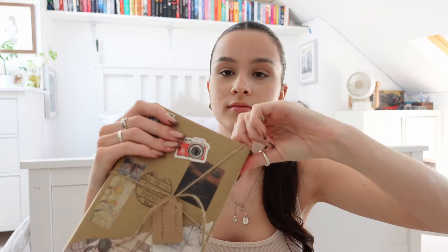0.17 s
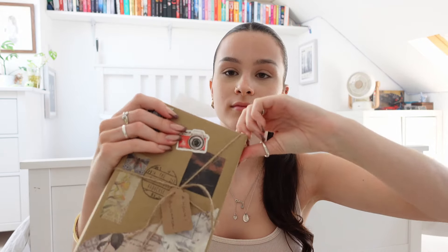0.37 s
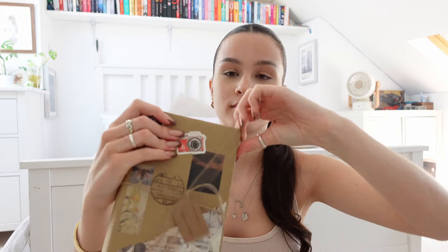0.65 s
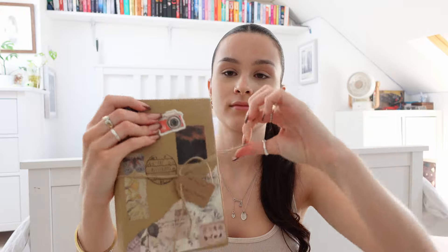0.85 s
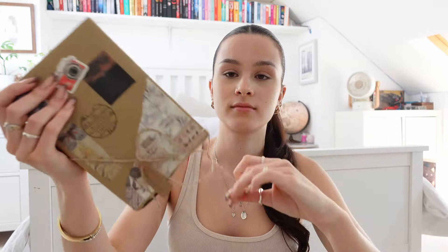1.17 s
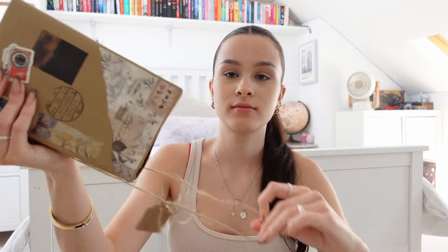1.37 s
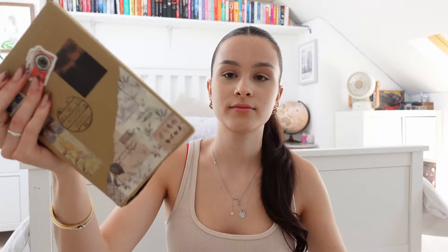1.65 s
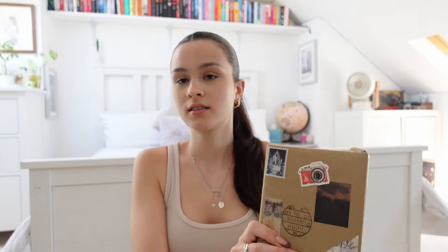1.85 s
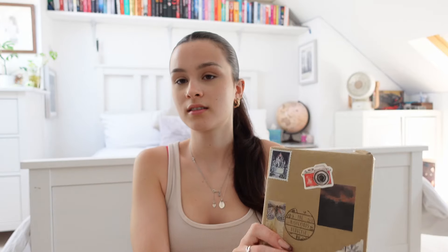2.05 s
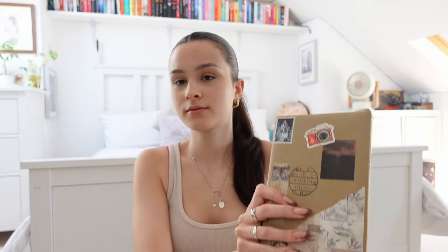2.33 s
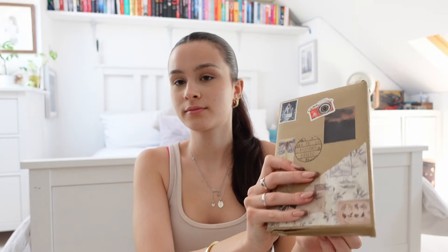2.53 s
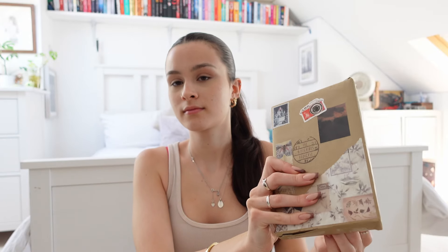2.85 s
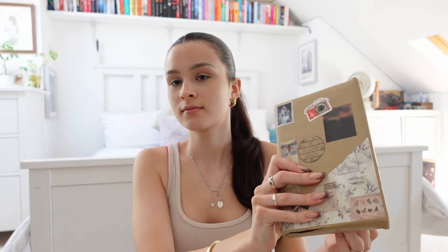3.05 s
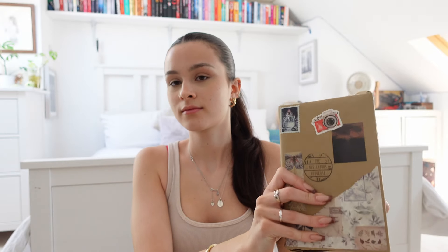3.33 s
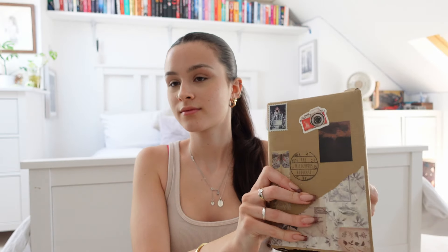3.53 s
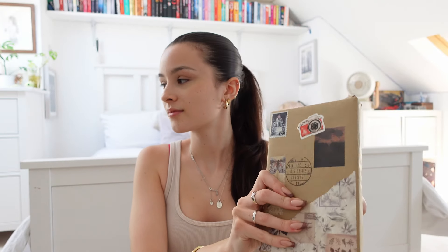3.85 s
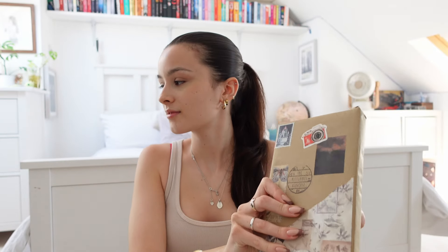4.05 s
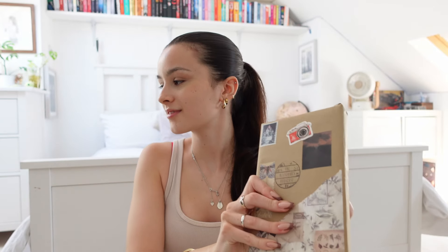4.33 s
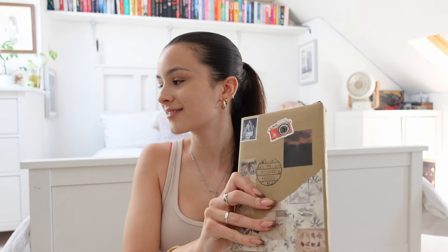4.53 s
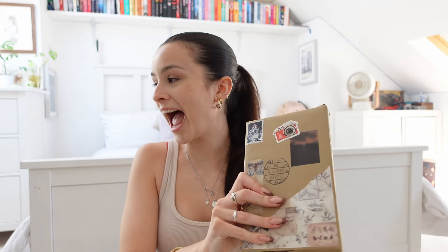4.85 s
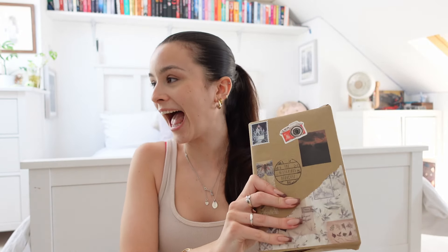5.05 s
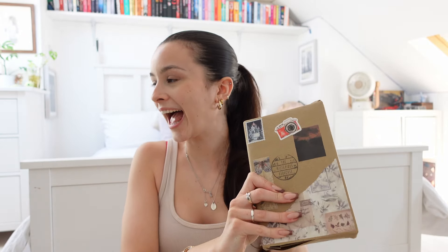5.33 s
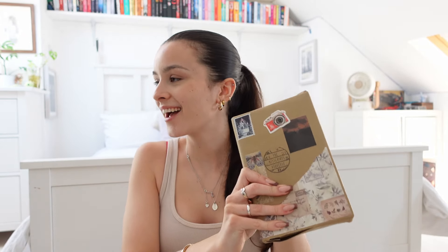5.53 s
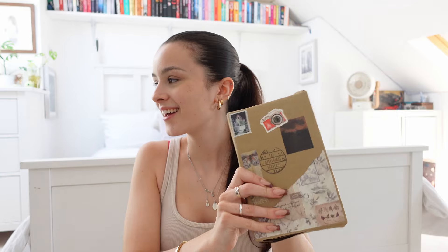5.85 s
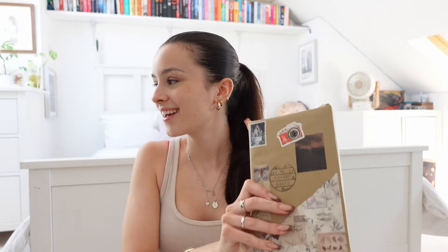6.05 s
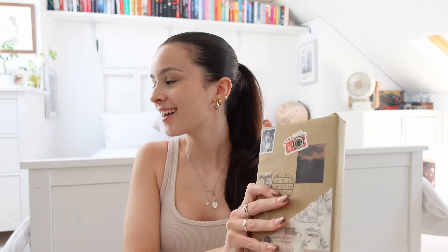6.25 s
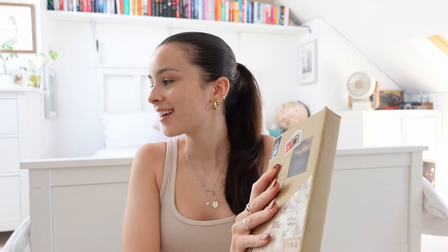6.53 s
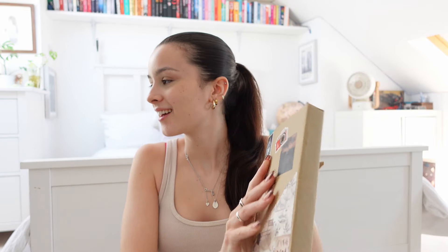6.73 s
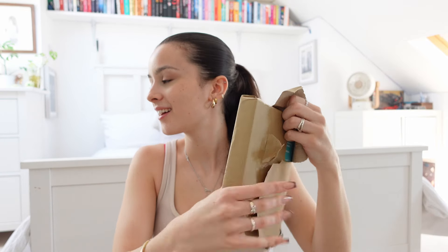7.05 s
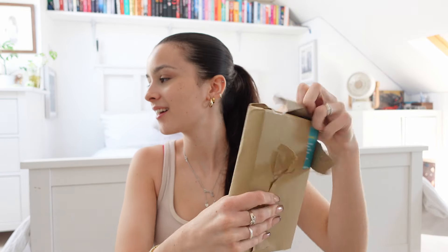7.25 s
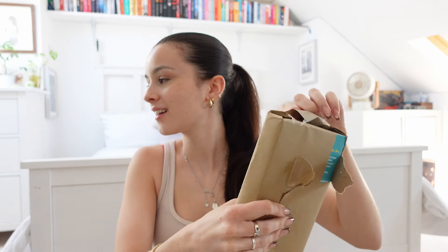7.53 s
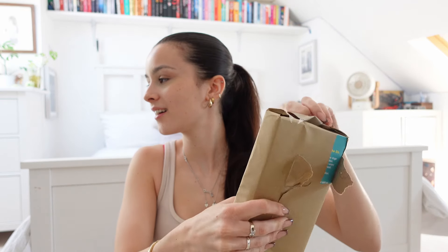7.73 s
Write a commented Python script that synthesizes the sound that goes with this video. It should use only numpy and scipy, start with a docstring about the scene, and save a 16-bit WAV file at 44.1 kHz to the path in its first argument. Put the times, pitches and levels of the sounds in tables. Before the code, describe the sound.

In a small, quiet room with faint steady hush, a book wrapped in stiff brown paper is handled close to the microphone. From 0 to 0.6 s there are faint rustles and tiny clicks; at about 0.7 s a sharp double crease snaps with dull finger knocks. From 1.0 to 1.55 s string rasps in short dry jerks, with a faint airy, fuzzy note, ending in a brief bright swish. Crinkles burst at 1.9 s, soft taps follow, and another crackle comes at 2.9 s. Fuller rustling and snaps fill 3.2 to 3.7 s. After a softer stretch, a crisp snap lands at 4.6 s. The densest crumpling and a firm knock come around 5.6 to 5.75 s, with more creases from 5.9 to 6.5 s. After a lull, knocks and bright tearing begin near 7.1 s, the loudest snap hits at 7.3 s, and gritty crackles thin out by 7.9 s.

```python
"""Creases of brown paper snap sharply, each with a short crumple, as a wrapped book is turned and torn open.
Each snap is a millisecond noise burst ringing a facet; rustle is noise and crackles coloured by the sheet.
Hands knock dully on the book: a damped resonance with a puff of noise. The string sings faintly as narrow
noise and scratches in short jerks. All is close to the microphone in a small room with a steady hush."""
import sys
import numpy as np
from scipy import signal
from scipy.fft import rfft, irfft
from scipy.io import wavfile
from scipy.ndimage import uniform_filter1d

SR = 44100
rng = np.random.default_rng(int(sys.argv[2]) if len(sys.argv) > 2 else 0)


def transcribe(u):
    """Save the signal u as a 16-bit wav file named by the first command-line argument.

    u: samples, shape (n,) or (channels, n), limited to [-1, 1]; the rate is SR.
    q: integer samples, one column per channel.
    """
    v = np.clip(np.atleast_2d(u).T, -1, 1)
    q = np.round(v * 32767).astype(np.int16)
    wavfile.write(sys.argv[1], SR, q)


N = 347508
TIME = np.arange(N) / SR
TAPS = 2048  # length of the short filters, samples
BINS = np.fft.rfftfreq(TAPS, 1 / SR)
MILLISECOND = SR / 1000  # in samples

# steady sound of the quiet room, relative spectrum: frequency_hz [Hz], density_db [dB per Hz]
HUSH_SPECTRUM = [(18, -80), (30, -42), (280, -13), (499, -16), (616, -4), (721, -5), (937, -9.5),
                 (1500, -20.5), (1810, -9), (2010, -22), (2980, -18.5), (7090, -17), (11400, -23),
                 (12600, -23), (16000, -27)]
HUSH_DB = -63
# decay of the room: frequency_hz [Hz], t60_s [s]
ROOM_DECAY = [(250, 0.58), (500, 0.19), (1000, 0.34), (2000, 0.27), (4000, 0.3), (7500, 0.2), (13000, 0.17)]
# reflections from near surfaces, before their times are scattered: delay_s [s], gain [amplitude ratio]
NEAR_ECHOES = [(.0071, 0.14), (0.0182, 0.14), (0.0204, .18), (.0272, 0.069)]
# weighting of the room's side signal: frequency_hz [Hz], side_db [dB]
SIDE_WIDTH = [(100, -4), (220, -8), (380, -10), (700, -6.5), (1200, -8), (2500, -8), (5000, -6.5),
              (14000, -3)]
# where the parcel is held: time_s [s], left_minus_right_db [dB]
PLACE_CURVE = [(0, 0.7), (1.2, 1.2), (1.6, 3), (2.2, -1.5), (3.0, .3), (5.7, 0.5), (7.2, -0.3),
               (7.88, -0.5)]
EDGE_HZ = 16100  # the recorder's upper band limit

# string running over the paper's edge: time_s [s], level_db [dB]
STRING_CURVE = [(1.1, -76), (1.24, -73), (1.285, -52), (1.32, -66), (1.4, -64), (1.45, -55.5), (1.485, -61),
                (1.525, -43.5), (1.56, -83)]
# jerks of the string rasping across the paper: start_s [s], length_s [s], level_db [dB]
STRING_TUGS = [(1.015, 0.039, -48.5), (1.055, 0.02, -46.5), (1.072, 0.023, -41), (1.103, 0.019, -44.5),
               (1.14, 0.05, -42), (1.198, 0.016, -50), (1.217, 0.032, -46), (1.268, 0.032, -44.5),
               (1.354, 0.017, -54.5), (1.424, 0.012, -59)]
# rasp of the string's fibres, relative spectrum: frequency_hz [Hz], density_db [dB per Hz]
RASP_SPECTRUM = [(300, -43), (1500, -15.5), (2500, -6.5), (4000, -7), (7000, 1.5), (11000, -2),
                 (15500, -8.5)]

# fingers knocking on the wrapped book: start_s [s], level_db [dB over 1 ms, before the low cut], pitch_hz [Hz]
KNOCK_EVENTS = [(0.435, -49, 350), (0.594, -46.5, 682), (0.705, -31, 310), (0.724, -34, 635),
                (1.764, -51, 373), (1.818, -41.5, 910), (2.113, -35, 700), (2.129, -34, 1140),
                (2.532, -41, 1480), (2.83, -45, 666), (2.941, -27.5, 960), (3.755, -41.5, 970),
                (4.108, -36.5, 1250), (5.319, -28.5, 982), (5.365, -31.5, 370), (5.61, -33.5, 372),
                (5.688, -18, 1160), (5.822, -31, 364), (6.372, -36.5, 730), (7.16, -27.5, 304),
                (7.203, -23, 336), (7.412, -34, 352), (7.761, -40.5, 362)]
# dull puff of paper pressed on the book, relative spectrum: frequency_hz [Hz], density_db [dB per Hz]
PUFF_SPECTRUM = [(40, -8), (140, -16), (300, 1.5), (1200, -3.5), (2200, -6), (6000, -27)]

# radiation of the paper, with the hollow of the parcel near 325 Hz, relative spectrum:
# frequency_hz [Hz], density_db [dB per Hz]
PAPER_SPECTRUM = [(30, -31), (60, -65), (150, -27), (250, -19.5), (325, -2.5), (480, -5.5), (800, -7.5),
                  (1150, -3.5), (3000, -0.5), (6000, -0.5), (10000, -4), (15500, -10)]
# share of the rustle that comes as separate crackles, low while rubbing, high once the paper tears:
# time_s [s], share [0-1]
GRIT_CURVE = [(0, 0.27), (1.5, 0.19), (2.8, 0.28), (4.0, 0.085), (5.0, 0.22), (6.5, 0.088), (7.3, 0.63),
              (7.55, 1)]
# strokes of paper sliding or tearing under the hands: start_s [s], length_s [s],
# level_db [dB of the drive, before colour and trim], brightness [dB per octave],
# body_db [dB, in the low hundreds of Hz], ring_hz [Hz, of the sheet]
SLIDE_STROKES = [(0.248, 0.2, -55.5, 2.5, 6, 8200), (0.486, 0.21, -55.5, 3.5, -2, 4200),
                 (0.672, 0.2, -47.5, 3, 10, 700), (1.057, 0.32, -58, 4, 6, 3880),
                 (1.414, 0.13, -60.5, 5.5, -3, 2300), (1.489, 0.061, -35.5, 5, -15, 6200),
                 (1.898, 0.064, -33, 4.5, 6, 600), (2.007, 0.088, -47, 2, 4, 5700),
                 (2.087, 0.085, -47.5, -1, 14.5, 4930), (2.17, 0.21, -65.5, -8.5, 13.5, 786),
                 (2.356, .11, -54, -2.5, 5, 4870), (2.581, 0.13, -50, 0, 6, 3500),
                 (2.707, 0.09, -49.5, 4.5, 5, 600), (2.878, 0.2, -53.5, -1, 13.5, 1000),
                 (3.102, 0.068, -50, -1.5, 11, 5500), (3.193, .07, -47.5, -4, 8, 7800),
                 (3.225, 0.18, -32.5, -0.5, 4, 595), (3.364, 0.18, -35.5, -3.5, -8, 4970),
                 (3.936, 0.11, -36, 1.3, 6.5, 6900), (4.102, 0.085, -44, 1.5, 13, 4900),
                 (4.239, 0.083, -51.5, 1.5, 15, 603), (4.418, 0.16, -45, 2.5, 10.5, 2970),
                 (4.586, 0.084, -31, 2, 4, 996), (4.878, 0.14, -48.5, 0, 7, 1000),
                 (5.027, 0.14, -39, 0.5, 4, 990), (5.258, 0.17, -39, 1.5, 7, 1100),
                 (5.462, 0.094, -47, 0.5, 6, 2200), (5.627, 0.075, -42.5, 3.5, 2, 7800),
                 (5.74, 0.12, -54, 5, 10, 1200), (5.931, 0.18, -35, -1.5, -2.5, 1800),
                 (6.171, 0.33, -49, 1.6, 7.5, 2330), (6.483, 0.094, -35, 1.5, 3, 2700),
                 (6.613, 0.16, -46.5, -2, -8, 1090), (6.763, 0.1, -47.5, 2, 0, 3500),
                 (7.102, 0.21, -46.5, 1.5, 18, 1200), (7.216, 0.23, -45, 3.5, 5, 600),
                 (7.346, 0.17, -40.5, 5, -15, 5500), (7.54, 0.14, -45, 4, -16, 3500),
                 (7.674, 0.16, -53.5, 6.5, 0, 2960)]
# faint shifting of the fingers between strokes: time_s [s], level_db [dB of the drive, before colour and trim]
GRIP_CURVE = [(0, -74), (1.7, -75), (2.2, -77), (3.0, -61), (3.6, -57.5), (3.85, -65.5), (5.0, -56),
              (6.6, -55), (6.95, -70), (7.5, -60.5), (7.88, -63)]
GRIP_BRIGHTNESS, GRIP_BODY_DB, GRIP_RING_HZ = 0.3, 9, 1710  # dB per octave, dB, Hz
# every stroke gathers speed, slows a little and stops
ATTACK_S, RELEASE_S, SAG_DB = 0.033, 0.036, 3
# a sliding sheet favours one broad band
SHEET_DB, SHEET_OCTAVES = 4, 0.51
# gentle rubbing, below this stroke level, loses treble above this frequency
GENTLE_HZ, GENTLE_DB_PER_OCTAVE, GENTLE_BELOW_DB = 9400, 4.5, -49

# buckling creases: start_s [s], level_db [dB over 1 ms, before colour], brightness [dB per octave],
# ring_hz [Hz, of the facet], crumple_db [dB relative to the snap, before colour]
SNAP_EVENTS = [(0.132, -50.5, -3.5, 11000, -16), (0.1945, -61, 2, 11000, -13),
               (0.2111, -47.5, -6.5, 1860, -20), (0.6228, -35.5, -2.5, 930, -7),
               (0.6587, -41.5, -3.5, 6820, -10), (0.7038, -26.5, 0.5, 6300, -6),
               (0.7216, -21.5, -2.5, 6640, -21), (0.7877, -41.5, -10.5, 3050, 0),
               (1.2291, -39, 0.5, 6360, -10), (1.3184, -46.5, 0, 7090, -18),
               (1.8792, -45.5, -3, 6400, 14.5), (1.9098, -32, -1.5, 9150, 13),
               (1.918, -21.5, -0.5, 6800, 1), (1.9534, -26.5, -4, 5540, 1), (2.4986, -34, 1, 5700, -2.5),
               (2.8667, -43, 1, 10400, 11), (2.8911, -30, -1.8, 6950, 9), (2.9007, -23.5, 1.5, 1140, -21),
               (2.9408, -28.5, 2, 2700, 2), (3.2468, -25, -0.5, 6200, -11),
               (3.2998, -23.5, -4.5, 5200, 5.5), (3.3223, -29, 1, 3000, 10.5), (3.3404, -19, 0, 3540, -1),
               (3.4147, -19.5, -4, 3170, 2), (3.6459, -22, -1, 3480, -20), (3.6534, -34.5, 1, 5800, 2),
               (3.9594, -36.5, -3, 4430, 11), (4.4391, -31.5, -1, 2970, -3), (4.506, -32.5, 2, 990, 4.5),
               (4.6002, -17, -0.5, 910, -14), (4.606, -20, 1, 7900, -4), (4.8678, -36.5, -5, 4630, 2.5),
               (5.0352, -35, -1, 940, 9), (5.2354, -37, -2.5, 1170, 6.5), (5.3222, -22.5, -0.5, 4270, 0),
               (5.3378, -26.5, 1, 1025, 4.5), (5.3649, -27, -1.5, 4670, 3.5), (5.5, -35.5, -2.5, 4600, 4),
               (5.6096, -35.5, -8, 2500, 0.5), (5.6303, -28, -2, 4220, 0.5),
               (5.6534, -24, -5.5, 2400, -3.5), (5.6889, -15.5, 0, 3920, 1.5), (5.7142, -15, 0, 1620, 3),
               (5.7368, -19, -0.5, 2730, 5.5), (5.915, -34.5, -0.5, 5810, 2.5),
               (5.9309, -21, 0, 1565, 11.5), (6.0319, -21, -1.2, 9600, 4.5), (6.039, -20.5, -5, 2310, -2.5),
               (6.0726, -20, -2.5, 2030, -28), (6.1059, -26.5, -1.5, 2310, -2),
               (6.168, -28, -7.5, 4840, -12), (6.2069, -26, -1, 1420, -22), (6.3127, -31, -5.5, 1970, -5.5),
               (6.494, -18, 1.5, 2800, 2.5), (6.5018, -20.5, 1.5, 2440, 9.5), (6.6873, -32.5, 0.5, 1970, 6),
               (6.7744, -50, -0.5, 7100, 12.5), (7.063, -40.5, -1, 925, 1), (7.0852, -43, 1, 8750, -6),
               (7.1425, -27.5, -3, 880, -3.5), (7.2119, -22.5, -2, 2470, 1), (7.227, -36, 1.5, 8700, 9),
               (7.246, -22, -3, 4720, -6), (7.277, -30, 0, 5830, 9), (7.2972, -11, 0.5, 1060, -4),
               (7.321, -28, 6, 5550, -19), (7.4094, -15, -2, 2980, -8.5), (7.4333, -22, 4, 5340, -18),
               (7.44, -23.5, -2.5, 5900, -16), (7.524, -37, 3, 10900, 1.5), (7.5455, -34, 5, 10700, -23),
               (7.5717, -38, 4, 7830, -17), (7.583, -32, 4.5, 2520, -14), (7.64, -33, 5.5, 2210, -26),
               (7.7842, -47, 4, 11200, 2.5)]
# a small snap is one facet and rings clearly; a loud one flips many, so its ring blurs
RING_DB, RING_AT_DB, RING_LOSS_PER_DB = 10, -35, 0.2073
# a snap's body follows its brightness: dB, dB of body per dB per octave
SNAP_BODY_DB, BODY_PER_TILT = -2, 1.3


def gain_of(db):
    """Logarithmic level: decibels to amplitude."""
    return 10 ** (np.asarray(db) / 20)


def evened(x):
    """Power normalisation: scales to rms 1."""
    return x / np.sqrt(np.mean(x ** 2) + 1e-20)


def unit(x):
    """Energy normalisation: scales to energy 1."""
    return x / (np.linalg.norm(x) + 1e-12)


def read(points, hz):
    """Logarithmic interpolation: reads a spectrum on a log-frequency axis."""
    f, value = np.transpose(points)
    return np.interp(np.log(hz + 1), np.log(f + 1), value)


def follow(rows, t):
    """Linear interpolation: reads a one-value curve at the times t."""
    s, value = np.transpose(rows)
    return np.interp(t, s, value)


def add(mix, s, sound):
    """Superposition: mixes a sound in at the time s."""
    part = mix[max(round(s * SR), 0):][:len(sound)]
    part += sound[:len(part)]


def shaped(x, points):
    """Spectral weighting: multiplies the spectrum of a long sound by a gain curve."""
    gain = gain_of(read(points, np.fft.rfftfreq(len(x), 1 / SR)))
    return irfft(rfft(x) * gain, len(x))


def causal(gain):
    """Minimum phase: the most compact causal impulse response with this gain at BINS, by folded cepstrum."""
    cepstrum = irfft(np.log(gain + 1e-6))
    cepstrum[1:TAPS // 2] *= 2
    cepstrum[TAPS // 2 + 1:] = 0
    return irfft(np.exp(rfft(cepstrum)))


def resonance_bump(hz, octaves):
    """Resonance: a bell of height 1 on a log-frequency axis."""
    return np.exp(-(np.log2((BINS + 1) / hz) / octaves) ** 2)


def blend(grains, smooth, grit):
    """Power sharing: grit is the share of power that comes as grains."""
    return np.sqrt(grit) * grains + np.sqrt(1 - grit) * smooth


def stereo(mid, side):
    """Mid-side matrixing: left and right from mid and side."""
    return np.array([mid + side, mid - side])


def low_cut(x, hz=110):
    """Radiation of a small source: a hand-sized object moves little air in the deep bass."""
    return signal.sosfilt(signal.butter(2, hz, "highpass", fs=SR, output="sos"), x)


def crackles(length, per_s, spread_db):
    """Random fracture: fibres give way at random moments, in many small clicks and a few large."""
    sizes = gain_of(spread_db * np.minimum(rng.exponential(1, length), 3.5))
    signs = rng.choice([-1, 1], length)
    return evened(sizes * signs * (rng.random(length) < per_s / SR))


def stick_slip(flutter_hz=35, depth_db=1.5):
    """Stick-slip friction: sliding contact catches and lets go many times a second, a gain near 1."""
    f = np.fft.rfftfreq(N, 1 / SR)
    wobble = irfft(rfft(rng.standard_normal(N)) * f * np.exp(-(f / flutter_hz) ** 2), N)
    return evened(gain_of(depth_db * evened(wobble)))


def hush(side_db=-9):
    """Stationary noise: steady room air and microphone hiss."""
    mid = evened(shaped(rng.standard_normal(N), HUSH_SPECTRUM))
    side = evened(shaped(rng.standard_normal(N), HUSH_SPECTRUM))
    return gain_of(HUSH_DB) * stereo(mid, gain_of(side_db) * side)


def room_tail(build_s):
    """Diffuse reverberation: scattered reflections build up, then die at a rate set by their frequency."""
    t = np.arange(SR // 2) / SR
    signs = rng.choice([-1., 1.], len(t))
    struck = rng.random(len(t)) < 5000 / SR  # 5000 reflections per second on average
    taps = signs * struck * np.sqrt(np.minimum(t / build_s, 1))
    hz, at, z = signal.stft(taps, SR, nperseg=256)
    decay = gain_of(-60 * at / read(ROOM_DECAY, hz)[:, None])
    return unit(signal.istft(z * decay, SR, nperseg=256)[1])


def room(dry, tail_db=-5.5, side_db=-4, near_db=-13, near_s=0.00051, wander=0.15, cycles_per_s=2.3, count=7):
    """Time-varying reflection: mid and side fade through a cycle of patterns as the parcel turns."""
    mid, side, t = np.zeros(N), np.zeros(N), np.arange(TAPS) / SR
    for k in range(count):
        # each pattern fades in, peaks and fades out as the next takes over
        away = (TIME * cycles_per_s * count - k + 1) % count - 1
        part = dry * np.cos(np.pi / 2 * np.minimum(away, 1))
        response = gain_of(tail_db) * room_tail(build_s=0.002)
        for delay, gain in NEAR_ECHOES:
            add(response, delay * (1 + wander * rng.uniform(-1.1, 1)), np.array([gain]))
        mid += signal.oaconvolve(part, response)[:N]
        spread = gain_of(side_db) * room_tail(build_s=0.0008)
        # the wide sheet reaches the two capsules slightly differently even before the room answers
        near = unit(rng.standard_normal(TAPS) * np.exp(-t / near_s))
        add(spread, 0, gain_of(near_db) * near)
        side += signal.oaconvolve(part, spread)[:N]
    return mid, shaped(side, SIDE_WIDTH)


def string(hz=2350, width_hz=260):
    """Resonant friction noise: the string sliding over the paper's edge makes a faint, fluttering, fuzzy note."""
    f = np.fft.rfftfreq(N, 1 / SR)
    resonance = 1 / (1 + ((f - hz) / width_hz) ** 2)
    note = evened(irfft(rfft(rng.standard_normal(N)) * resonance, N))
    note = note * stick_slip(flutter_hz=70, depth_db=3.5)
    running = (TIME > STRING_CURVE[0][0]) * (TIME < STRING_CURVE[-1][0])
    return note * gain_of(follow(STRING_CURVE, TIME)) * running


def tugs(grit=0.3):
    """Dry friction: the string slips in short jerks, its fibres scratching the paper."""
    envelope = np.zeros(N)
    for s, length_s, db in STRING_TUGS:
        add(envelope, s, gain_of(db) * signal.windows.tukey(int(length_s * SR), 0.5))
    fibres = blend(crackles(N, per_s=2900, spread_db=12), rng.standard_normal(N), grit)
    return envelope * evened(shaped(fibres, RASP_SPECTRUM))


def knocks(sharpness=6.5, thud_s=0.0064, thud_db=-4):
    """Damped resonance: a fingertip rings the cover for a few cycles, with a dull puff from the paper over it."""
    out, t = np.zeros(N), np.arange(TAPS) / SR
    dull = causal(gain_of(read(PUFF_SPECTRUM, BINS)))
    for s, db, hz in KNOCK_EVENTS:
        ratio = (BINS + 1) / hz
        # the small cover radiates poorly below its resonance
        radiation = np.minimum(ratio, 1)
        cover = unit(causal(radiation / np.hypot(1, sharpness * (ratio - 1 / ratio))))
        burst = rng.standard_normal(TAPS) * np.exp(-t / thud_s)
        puff = unit(signal.fftconvolve(burst, dull)[:TAPS])
        add(out, s, gain_of(db) * np.sqrt(MILLISECOND) * unit(cover + gain_of(thud_db) * puff))
    return out


def paper_colour(brightness, body_db, pivot_hz=3000, knee_hz=700, body_hz=570):
    """Size and radiation: taut small folds sound bright; a wide sheet or the book behind it adds body."""
    octaves = np.log2(np.maximum(BINS, knee_hz) / pivot_hz)
    low = 1 / (1 + (BINS / body_hz) ** 4)
    radiated = evened(gain_of(read(PAPER_SPECTRUM, BINS)))
    return radiated * gain_of(brightness * octaves + body_db * low)


def sliding(t):
    """Power addition: amplitude, brightness, body and ring of the paper; the strongest motion sets the colour."""
    power = gain_of(follow(GRIP_CURVE, t)) ** 2
    colour = np.outer([GRIP_BRIGHTNESS, GRIP_BODY_DB, np.log(GRIP_RING_HZ)], power)
    for start, length, db, brightness, body_db, ring_hz in SLIDE_STROKES:
        now = slice(*np.searchsorted(t, [start, start + length]))
        age = t[now] - start
        speed = np.minimum(age / ATTACK_S, 1) * np.minimum((length - age) / RELEASE_S, 1)
        stroke = (speed * gain_of(db - SAG_DB * age / length)) ** 2
        power[now] += stroke
        colour[:, now] += np.outer([brightness, body_db, np.log(ring_hz)], stroke)
    brightness, body_db, log_ring = colour / power
    return np.sqrt(power), brightness, body_db, np.exp(log_ring)


def rustle(count=12, facet_db=9, facet_octaves=0.29, patchy_db=2):
    """Friction noise: smooth rubbing plus crackles from facets of many sizes, coloured by how the sheet is held."""
    grains = np.zeros(N)
    for hz in np.geomspace(1200, 13000, count):
        facet = causal(gain_of(facet_db * resonance_bump(hz, facet_octaves)))
        grains += signal.oaconvolve(crackles(N, per_s=110, spread_db=6.0), unit(facet))[:N]
    texture = blend(evened(grains), rng.standard_normal(N), follow(GRIT_CURVE, TIME))
    drive = sliding(TIME)[0] * texture
    _, t, z = signal.stft(drive, SR, nperseg=TAPS // 4, nfft=TAPS)
    strength, brightness, body_db, ring_hz = sliding(t)
    gentle = 1 / (1 + (strength[:, None] / gain_of(GENTLE_BELOW_DB)) ** 2)
    soft_db = GENTLE_DB_PER_OCTAVE * gentle * np.log2(np.maximum(BINS / GENTLE_HZ, 1))
    sheet_db = SHEET_DB * resonance_bump(ring_hz[:, None], SHEET_OCTAVES)
    # the sheet's resonances wander as it bends: noise smoothed over time, then over frequency
    patches = uniform_filter1d(rng.standard_normal(z.T.shape), size=5, axis=0)
    patches = evened(uniform_filter1d(patches, size=30, axis=1))
    colour = paper_colour(brightness[:, None], body_db[:, None])
    colour = colour * gain_of(sheet_db - soft_db + patchy_db * patches)
    return signal.istft(z * colour.T, SR, nperseg=TAPS // 4, nfft=TAPS)[1][:N]


def snaps(snap_s=0.0014, rise_s=0.00054, crumple_s=0.028, ring_octaves=0.58, crumple_ring=0.84, grit=0.18):
    """Buckling instability: a crease flips in a millisecond, rings its facet and sets off smaller buckles."""
    out, t = np.zeros(N), np.arange(TAPS * 3) / SR
    for s, db, brightness, ring_hz, crumple_db in SNAP_EVENTS:
        colour = paper_colour(brightness, SNAP_BODY_DB + BODY_PER_TILT * brightness)
        ring_db = RING_DB - RING_LOSS_PER_DB * (db - RING_AT_DB)
        bump_db = ring_db * resonance_bump(ring_hz, ring_octaves)
        facet = causal(colour * gain_of(bump_db))
        flip = rng.standard_normal(len(t)) * np.exp(-t / snap_s) * (1 - np.exp(-t / rise_s))
        flip = unit(signal.fftconvolve(flip, facet)) * np.linalg.norm(facet)
        buckles = blend(crackles(len(t), per_s=1200, spread_db=4.5), rng.standard_normal(len(t)), grit)
        # the buckles spread to other facets, so they keep only part of the ring
        other_facets = causal(colour * gain_of(crumple_ring * bump_db))
        crumple = signal.fftconvolve(unit(buckles * np.exp(-t / crumple_s)), other_facets)
        add(out, s, gain_of(db) * np.sqrt(MILLISECOND) * (flip + gain_of(crumple_db) * crumple))
    return out


def scene(rustle_db=-1.5):
    """Direct and reflected sound: the parcel stays near the middle; the room spreads it to the sides."""
    handling = gain_of(rustle_db) * rustle() * stick_slip() + knocks()
    dry = snaps() + low_cut(handling) + string() + tugs()
    reflected, side = room(dry)
    lean_db = follow(PLACE_CURVE, TIME) / 2
    return stereo(dry + reflected, side) * gain_of([lean_db, -lean_db]) + hush()


def record(dry):
    """Band limitation: the recorder's linear-phase low-pass."""
    lowpass = signal.firwin(511, EDGE_HZ, window=("kaiser", 9), fs=SR)
    return signal.oaconvolve(dry, lowpass[None], "same")


dry = scene()
out = record(dry)
transcribe(out)
```